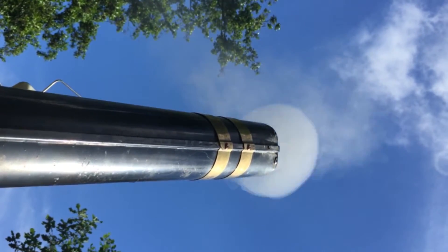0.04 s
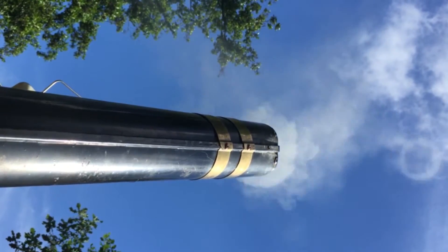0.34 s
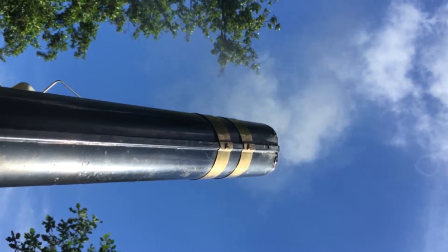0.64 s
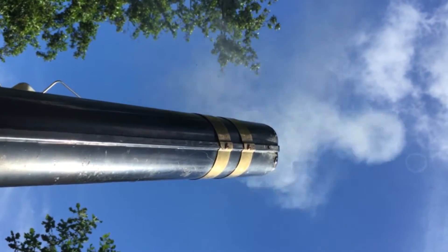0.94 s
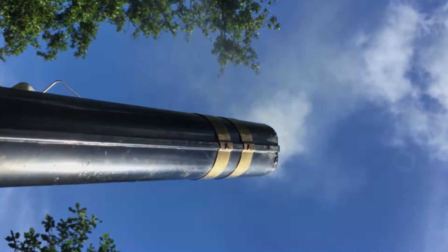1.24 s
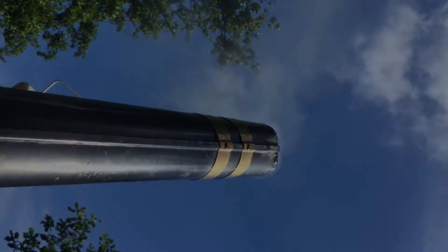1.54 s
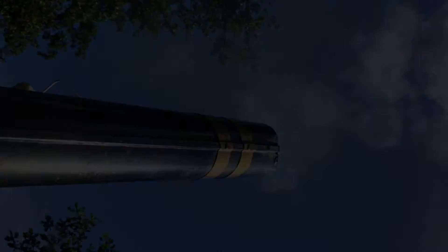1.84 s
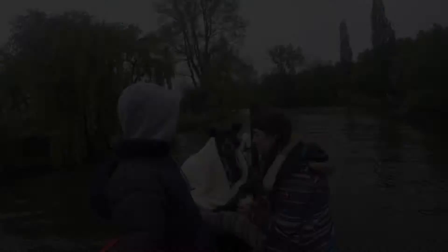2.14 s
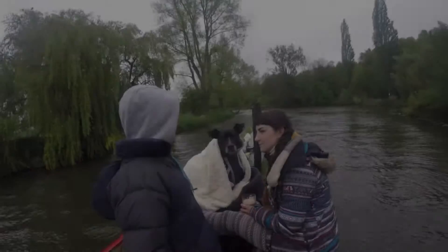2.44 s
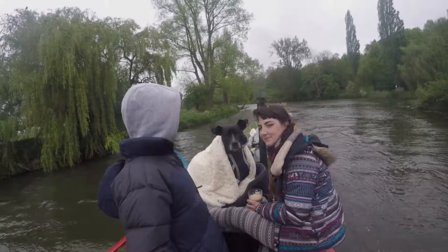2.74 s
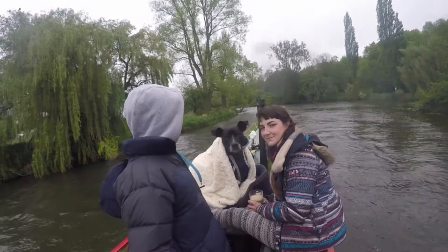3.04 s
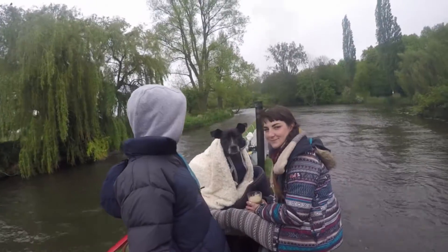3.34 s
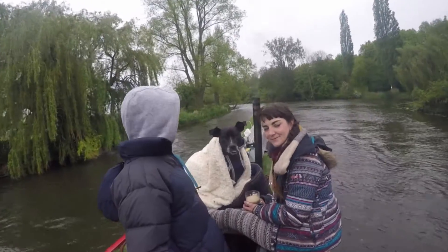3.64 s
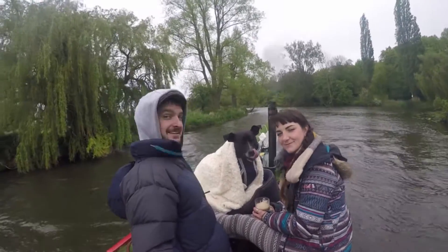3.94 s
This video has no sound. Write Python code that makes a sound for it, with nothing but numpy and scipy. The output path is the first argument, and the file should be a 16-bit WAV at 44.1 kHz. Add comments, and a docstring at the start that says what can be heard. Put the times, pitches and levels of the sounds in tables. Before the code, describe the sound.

A slow diesel boat engine fires in pairs at about 0.2, 0.9 and 1.6 seconds, each low thump puffing gas and ringing a steel stack, with faint intake air and a low hum between. Near 2 seconds the sound changes to aboard a boat on a river: a faster engine throbs and rumbles steadily with light valve clatter until 4 seconds, while water softly washes and slaps the hull.

```python
"""A breath of intake air over an engine-room murmur, then a slow two-cylinder boat diesel fires in pairs
up a tall steel stack: each firing is a low thump, a rush of gas and a pressure front that rings the pipe,
and comes back weaker as an echo. Near two seconds the scene changes to aboard a boat under way on a river:
a faster engine throbs through the hull, its valve gear clatters, and water washes past and slaps the hull.
Both places are heard nearly in mono, as from one microphone position."""
import sys
import numpy as np
from scipy import signal
from scipy.fft import rfft, irfft
from scipy.io import wavfile
from scipy.ndimage import uniform_filter1d, minimum_filter1d

SR = 44100
rng = np.random.default_rng(int(sys.argv[2]) if len(sys.argv) > 2 else 0)


def transcribe(u):
    """Save the signal u as a 16-bit wav file named by the first command-line argument.

    u: samples, shape (n,) or (channels, n), limited to [-1, 1]; the rate is SR.
    q: integer samples, one column per channel.
    """
    v = np.clip(np.atleast_2d(u).T, -1, 1)
    q = np.round(v * 32767).astype(np.int16)
    wavfile.write(sys.argv[1], SR, q)


N = 176400
TIME = np.arange(N) / SR

# At the stack. Noise colours: (frequency [Hz], relative level per Hz [dB])
MURMUR_COLOUR = [(25, -6), (75, -1.5), (100, 15.5), (135, -6), (172, 2.5), (360, -1.5), (600, -3),
                 (980, -12.5), (1400, -18), (2700, -24.5), (5400, -38), (6600, -38), (8000, -58),
                 (15000, -71)]
INTAKE_COLOUR = [(300, -6.5), (600, 5), (1100, -10), (2600, -20.5), (4000, -25.5), (6000, -24.5),
                 (8000, -40.5)]
RASP_COLOUR = [(700, -1.5), (1200, 2), (1540, 6), (1900, -1.5), (2700, -30.5), (4000, -58), (7000, -56.5)]
RUSH_COLOUR = [(300, 1), (390, -2.5), (540, -3.5), (800, -7), (1130, -6.5), (1600, -11.5), (2200, -19),
               (2650, -14.5), (2950, -26.5), (3600, -24), (5000, -35.5), (6500, -47.5), (8000, -58.5),
               (14000, -82.5)]
BLAST_COLOUR = [(600, 7.5), (1000, 12.5), (1600, -4), (2200, 0.5), (2700, -2), (3600, -6.5), (5000, -13.5),
                (6500, -27.5), (8000, -61)]
TICK_COLOUR = [(1500, 1), (3000, -3), (6500, -9), (10000, -23), (15000, -54)]
# breaths of intake air: (time [s], level [dB])
INTAKES = [(.04, -41.5), (.77, -43), (1.47, -47)]
# firings: (time [s], cylinder [0 or 1], pressure front [dB], gas rush [dB], thump [dB])
FIRINGS = [(0.202, 0, 3, 0.5, 5), (0.376, 1, -1, 2.5, 2.5), (.9255, 0, 2, 1.5, 6.5),
           (1.099, 1, 1.5, 3.5, 6), (1.6242, 0, 0.5, 1, 7), (1.799, 1, 0.5, 3, 1)]
# each cylinder's voice: (thump lead [s], thump pitch [Hz], thump half-length [s], rush rise [s],
# rush fall [s], pop pitch [Hz], rasp level [dB])
CYLINDERS = [(0.013, 78, 0.014, .015, 0.0048, 230, -30), (0.0018, 73, .011, 0.014, 0.012, 310, -34)]
# stack resonances: (frequency [Hz], level for cylinder 0 [dB], level for cylinder 1 [dB], t60 [s])
STACK_MODES = [(81.8, -23.5, -25.5, 0.49), (171.6, -14.5, -23.5, 0.21), (206, -11, -20, 0.046),
               (240.4, -11, -6, 0.16), (331.8, -18.5, -10, 0.17), (426, -29, -27.5, 0.21),
               (567, -28, -26, 0.23), (674.4, -26.5, -24.5, 0.12), (746, -19.5, -32, 0.065),
               (838, -26, -26.5, 0.075), (902, -34, -36.5, .09), (1145, -26, -51.5, 0.068),
               (1522.3, -28.5, -30.5, .08)]
# exhaust echoes: (delay [s], thump [dB], front delay [s], front [dB], rush [dB], rush half-length [s])
ECHOES = [(0.086, -4, .0915, -11.5, -12, 0.0096), (0.162, -9, .175, -31.5, -36, 0.015)]
# valve ticks between firings: (time [s], level [dB])
TICKS = [(.672, -55), (.756, -56), (0.827, -52.5), (1.42, -56)]

# On the river. Noise colours: (frequency [Hz], relative level per Hz [dB])
RUMBLE_COLOUR = [(12, 7), (22, -26), (30, 0.5), (45, -4), (65, -15), (85, -17.5), (110, -11.5), (200, -34),
                 (500, -59)]
WASH_COLOUR = [(65, -31), (110, -7), (192, -11), (542, -19.5), (854, -17), (2080, -18.5), (2400, -9.5),
               (2720, -16), (3710, -16.5), (5620, -33), (6230, -29), (7830, -32.5), (10900, -42),
               (13700, -41.5), (15500, -52)]
CLATTER_COLOUR = [(600, -29), (1500, -8), (2150, -14.5), (2450, -12.5), (2900, -3), (3700, -10.5),
                  (5200, -17), (6200, -34), (8000, -45), (15000, -32)]
SIZZLE_COLOUR = [(2500, -31), (4300, 13.5), (5300, -3), (6100, 6), (6900, -3.5), (7800, 4.5), (9200, -1),
                 (10300, -16), (12000, -29), (13700, -29), (15500, -20)]
SLAP_COLOUR = [(60, -44), (130, 7), (250, -12.5), (600, -10.5), (1500, -29), (4000, -48)]
# cycles of the faster engine: (time [s], level [dB])
CYCLES = [(1.8788, -0.5), (2.101, -1), (2.3198, -1.5), (2.539, -1), (2.7624, -1.5), (2.984, -1),
          (3.2038, -2.5), (3.425, -1.5), (3.645, -0.5), (3.864, -2.5)]
# valve gear contacts: (time in cycle [s], clatter [dB], sizzle [dB], decay [s], chink [Hz], chink [dB])
CONTACTS = [(.007, -47.5, -44, 0.041, 9030, -59), (0.019, -35.5, -62, 0.0094, 3720, -46),
            (0.049, -46, -46, 0.048, 6200, -52), (0.065, -36.5, -60.5, 0.0065, 7650, -51),
            (.106, -73.5, -50, 0.0088, 14400, -64), (.122, -47.5, -45.5, .009, 7500, -57.5),
            (0.185, -39.5, -49, 0.0033, 13300, -62), (0.216, -43, -80, 0.02, 2300, -53)]
# resonances of the engine's metal: (frequency [Hz], relative level [dB], t60 [s])
METAL_MODES = [(2350, -5, .05), (2470, 0, .08), (2565, -3, .07), (3140, -10, .04), (3560, -8, .06),
               (3780, -9, .07), (4310, -15, .07), (6020, -18, .06)]
# harmonics in the hull: (multiple of the firing rate, relative level [dB])
THROB_HARMONICS = [(2, -3), (3, -4.5), (4, -4), (5, -22)]
# course of the hull's bass and of the wash: (time [s], level [dB])
HULL_LEVEL = [(1.95, -28.5), (2.45, -29), (2.49, -36.5), (2.52, -29.5), (2.7, -29), (2.75, -38),
              (2.83, -23.5), (2.85, -26.5), (3.18, -28), (3.31, -22.5), (3.41, -31), (3.43, -30),
              (3.73, -23.5), (3.76, -37), (3.86, -24), (4.0, -23.5)]
WASH_LEVEL = [(1.9, -45), (2.45, -44), (2.8, -43.5), (3.2, -42), (3.6, -41), (4, -42.5)]
# water striking the hull: (time [s], level [dB])
SLAPS = [(2.045, -37), (2.326, -48), (2.552, -41), (3.17, -40), (3.66, -39), (3.824, -35), (3.99, -67)]

THUMP_DB, POP_DB, RUSH_DB, BLAST_DB, TURBULENCE_DB = -18.5, -17, -21, -29.5, -25
RUSH_LAG_S, RUSH_TAIL_S, RUSH_TAIL_DB = 0.0033, 0.079, -11   # the gas peaks just after the front
FRONT_EDGE_HZ, FRONT_SMEAR_S = 1600, 0.00501
RIVER_START_S, STACK_FADE_S = 1.888, (1.99, 2.08)
CYCLE_S, METAL_DB, THROB_DB, RUMBLE_DB = 0.2205, -48.5, -1.5, -6
CEILING, LIMITER_S, CUTOFF_HZ = 0.97, 0.004, 15500


def from_db(db):
    """Decibels to gain."""
    return 10 ** (np.asarray(db) / 20)


def rms_one(x):
    """Scale to rms 1."""
    return x / np.sqrt(np.mean(x ** 2) + 1e-20)


def level(rows):
    """Gain over time from (time [s], level [dB]) points."""
    return from_db(np.interp(TIME, *np.transpose(rows)))


def noise(colour):
    """Noise of rms 1 with the given colour, falling away beyond its ends."""
    hz, db = np.transpose(colour)
    f = np.maximum(np.fft.rfftfreq(N, 1 / SR), 1)
    skirts = np.minimum(f / hz[0], 1) ** 2 * np.minimum(hz[-1] / f, 1) ** 2
    shape = skirts * from_db(np.interp(np.log(f), np.log(hz), db))
    return rms_one(irfft(rfft(rng.standard_normal(N)) * shape, N))


def drift(hz):
    """Random wander of rms 1, mostly slower than hz."""
    f = np.fft.rfftfreq(N, 1 / SR)
    return rms_one(irfft(rfft(rng.standard_normal(N)) / (1 + (f / hz) ** 2), N))


def butter(x, order, hz, kind):
    """Butterworth filter."""
    return signal.sosfilt(signal.butter(order, hz, kind, fs=SR, output="sos"), x)


def ring(drive, hz, t60):
    """One resonance: a unit click starts a decaying sine of height 1."""
    r, w = from_db(-60 / (t60 * SR)), 2 * np.pi * hz / SR
    return signal.lfilter([0, np.sin(w)], [1, -2 * r * np.cos(w), r * r], drive + 1e-18)


def swell(at, width):
    """A smooth swell centred on a moment."""
    return np.exp(-np.minimum(((TIME - at) / width) ** 2, 60))


def burst(at, rise, fall):
    """A swell up to a moment, then an exponential fall."""
    return np.where(TIME < at, swell(at, rise), np.exp(-np.minimum(np.abs(TIME - at) / fall, 60)))


def click(at):
    """One unit click."""
    return signal.unit_impulse(N, int(at * SR))


def pulse(at, hz, width):
    """A short low pressure wave."""
    return swell(at, width) * np.cos(2 * np.pi * hz * (TIME - at))


def room_murmur():
    """Room tone: the engine room's low, wavering murmur."""
    return from_db(-37.5 + drift(10)) * noise(MURMUR_COLOUR)


def air_intake():
    """Air is drawn in before each pair of firings."""
    return sum(from_db(db) * swell(s, width=0.037) for s, db in INTAKES) * noise(INTAKE_COLOUR)


def exhaust(cylinder):
    """One cylinder's firings at the stack: thump, gas and a pressure front, with echoes in the pipe."""
    lead, thump_hz, width, rise, fall, pop_hz, rasp_db = CYLINDERS[cylinder]
    thumps, pops, fronts, flow, leak, surge = np.zeros((6, N))
    for s, _, front_db, rush_db, thump_db in [row for row in FIRINGS if round(row[1]) == cylinder]:
        peak = s + RUSH_LAG_S
        thumps += from_db(thump_db) * pulse(s - lead, thump_hz, width)
        pops += from_db(front_db) * pulse(s - 0.5 / pop_hz, pop_hz, width=0.0079)   # the front's own pop
        fronts += from_db(front_db) * click(s)
        leak += from_db(rush_db) * swell(s - 0.014, width=0.0094)   # the valve cracks open
        surge += from_db(rush_db) * burst(peak, rise=0.0072, fall=0.0072)
        tail = from_db(RUSH_TAIL_DB) * burst(peak, rise, RUSH_TAIL_S)
        flow += from_db(rush_db) * np.hypot(burst(peak, rise, fall), tail)
        for delay, echo_thump_db, front_delay, echo_front_db, echo_rush_db, spread in ECHOES:
            thumps += from_db(thump_db + echo_thump_db) * pulse(s - lead + delay, thump_hz, width)
            fronts += from_db(front_db + echo_front_db) * click(s + front_delay)
            flow += from_db(rush_db + echo_rush_db) * swell(s + delay, spread)
    pipe = stack_ring(cylinder, fronts, flow)
    rush = from_db(RUSH_DB + 0.87 * drift(140)) * flow * noise(RUSH_COLOUR)
    rasp = from_db(rasp_db) * leak * noise(RASP_COLOUR)
    blast = from_db(BLAST_DB) * surge * noise(BLAST_COLOUR)
    polarity = (-1) ** cylinder
    return from_db(THUMP_DB) * polarity * thumps - from_db(POP_DB) * pops + pipe + rush + rasp + blast


def stack_ring(cylinder, fronts, flow):
    """Pressure fronts and turbulent gas ring the steel stack."""
    turbulence = from_db(TURBULENCE_DB) * flow * butter(rng.standard_normal(N), 3, 500, "high")
    pipe = np.zeros(N)
    for hz, *cylinder_db, t60 in STACK_MODES:
        height = hz / STACK_MODES[-1][0]   # higher modes take more turbulence and may start later
        lag = int(FRONT_SMEAR_S * SR * rng.random() * height)
        drive = np.roll(fronts, lag) + turbulence * height
        pipe += from_db(cylinder_db[cylinder]) * ring(drive, hz, t60)
    return butter(pipe, 3, FRONT_EDGE_HZ, "low")


def valve_ticks():
    """The slow engine's valves tick faintly between firings."""
    return sum(from_db(db) * burst(s, rise=0.0019, fall=0.0038) for s, db in TICKS) * noise(TICK_COLOUR)


def valve_gear():
    """On the river the same contacts come round every cycle; each rings the metal and has its own chink."""
    clatter_power, sizzle_power, chinks = np.zeros((3, N))
    for s, clatter_db, sizzle_db, decay, hz, chink_db in CONTACTS:
        hits = np.zeros(N)
        for start, db in CYCLES:
            hits += from_db(db + 0.5 * rng.standard_normal()) * burst(start + s, rise=0.0045, fall=decay)
        clatter_power += (from_db(clatter_db) * hits) ** 2
        sizzle_power += (from_db(sizzle_db) * hits) ** 2
        chinks += from_db(chink_db) * hits * noise([(hz * 5 / 6, -26), (hz, 0), (hz * 7 / 6, -26)])
    rattle = np.sqrt(clatter_power) * rng.standard_normal(N)
    metal = rms_one(sum(from_db(db) * rms_one(ring(rattle, hz, t60)) for hz, db, t60 in METAL_MODES))
    clatter = np.sqrt(clatter_power) * noise(CLATTER_COLOUR)
    sizzle = np.sqrt(sizzle_power) * noise(SIZZLE_COLOUR)
    flicker = from_db(0.75 * drift(250))
    return from_db(METAL_DB) * metal + chinks + (clatter + sizzle) * flicker


def hull_throb():
    """Four firings a cycle throb through the hull, over a lumpy rumble."""
    firing_count = 4 * TIME / CYCLE_S
    throb = np.zeros(N)
    for multiple, db in THROB_HARMONICS:
        gain = from_db(db + 0.94 * drift(5.5))
        phase = 2 * np.pi * (round(multiple) * firing_count + rng.random()) + 0.91 * drift(1)
        throb += gain * np.sin(phase)
    rumble = from_db(RUMBLE_DB) * noise(RUMBLE_COLOUR)
    return level(HULL_LEVEL) * (from_db(THROB_DB) * rms_one(throb) + rumble)


def river_wash():
    """Water and wind wash past the boat."""
    return level(WASH_LEVEL) * from_db(1.02 * drift(60)) * noise(WASH_COLOUR)


def hull_slaps():
    """Water slaps the hull in short, dull knocks."""
    return sum(from_db(db) * burst(s, rise=0.006, fall=0.012) for s, db in SLAPS) * noise(SLAP_COLOUR)


def scene():
    """The river cuts in just before the stack fades; a faint reflection gives both a little width."""
    stack = valve_ticks() + air_intake() + room_murmur() + exhaust(cylinder=0) + exhaust(cylinder=1)
    stack *= np.interp(TIME, STACK_FADE_S, [1, 0])
    river = (hull_slaps() + river_wash() + valve_gear() + hull_throb()) * (TIME >= RIVER_START_S)
    stack_side = from_db(-21) * butter(stack, 1, [600, 2500], "band")
    river_side = from_db(-56) * signal.lfilter([1, -1], [1, -0.9], river)   # bass removed
    reflection = np.pad(stack_side + river_side, (int(0.021 * SR), 0))[:N]   # 21 ms late
    return stack + river + reflection * np.array([[1], [-1]])


def record(dry):
    """Behind the microphone a fast limiter holds the peaks under full scale; the top is cut."""
    size = int(LIMITER_S * SR)
    peaks = np.maximum(np.abs(dry).max(axis=0), CEILING)
    gain = minimum_filter1d(CEILING / peaks, 2 * size)
    gain = uniform_filter1d(uniform_filter1d(gain, size), size)
    top_cut = signal.ellip(10, 0.05, 60, CUTOFF_HZ, fs=SR, output="sos")
    return signal.sosfiltfilt(top_cut, dry * gain)


dry = scene()
out = record(dry)
transcribe(out)
```